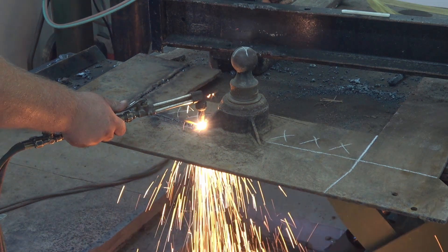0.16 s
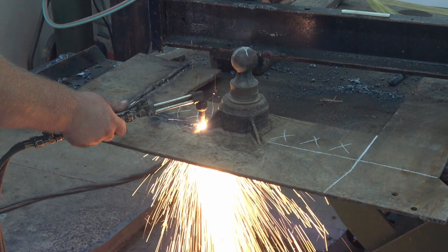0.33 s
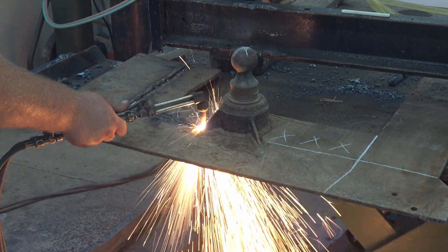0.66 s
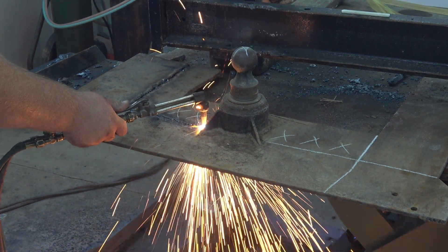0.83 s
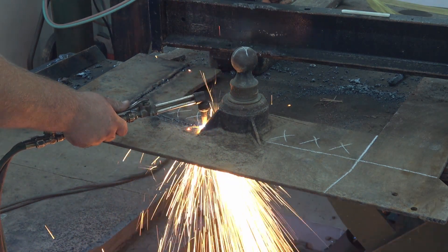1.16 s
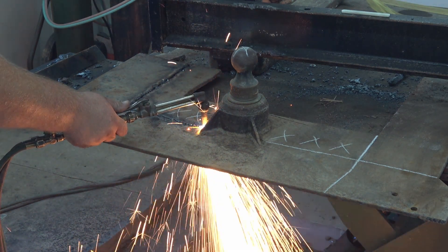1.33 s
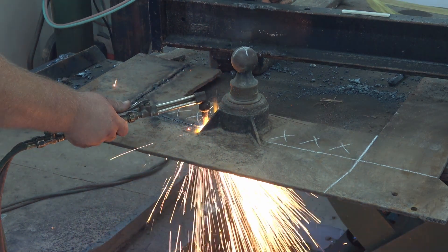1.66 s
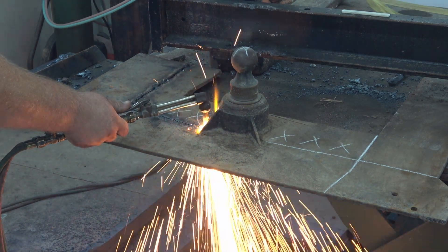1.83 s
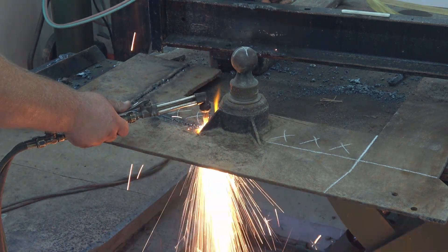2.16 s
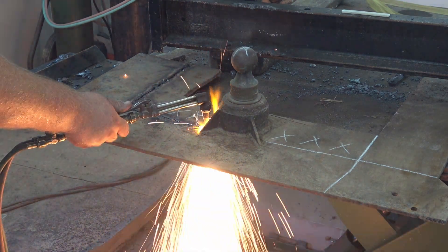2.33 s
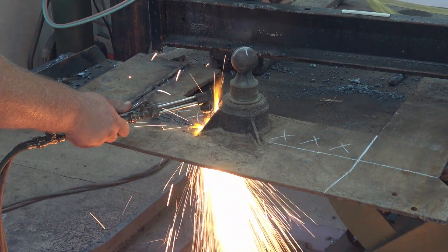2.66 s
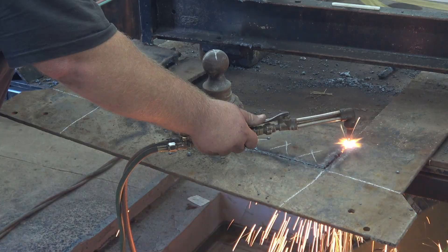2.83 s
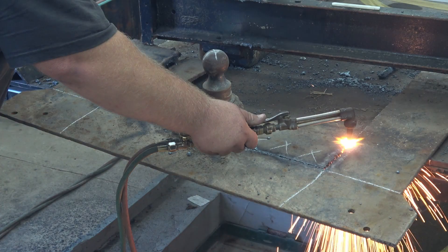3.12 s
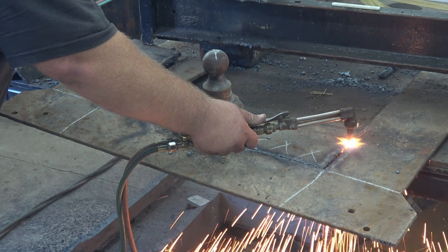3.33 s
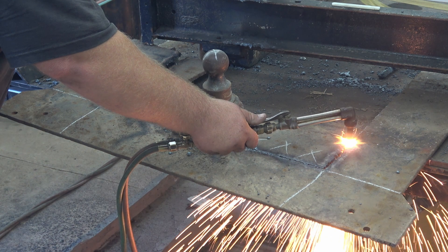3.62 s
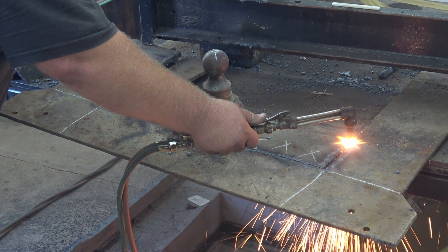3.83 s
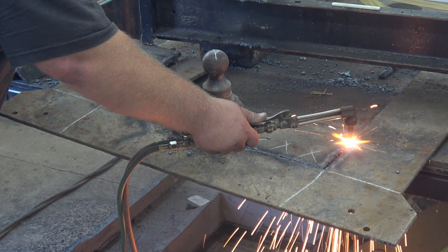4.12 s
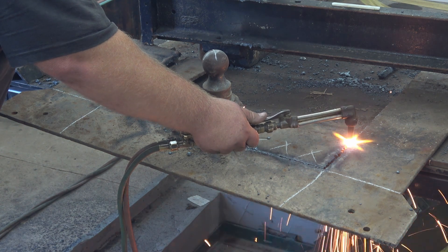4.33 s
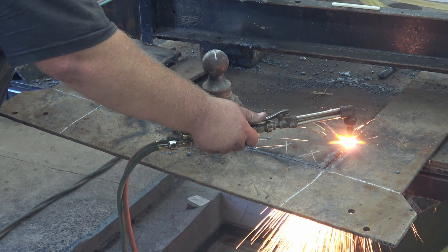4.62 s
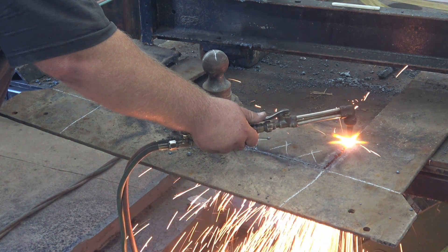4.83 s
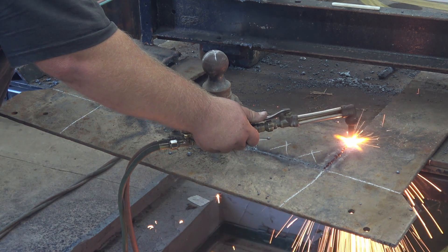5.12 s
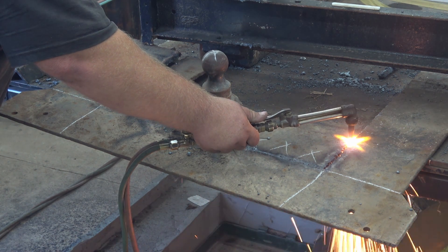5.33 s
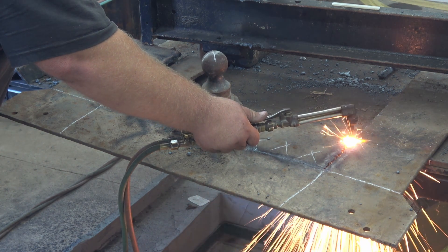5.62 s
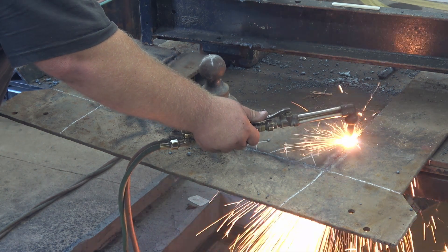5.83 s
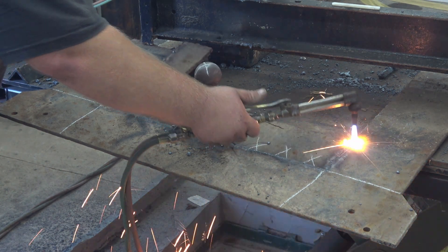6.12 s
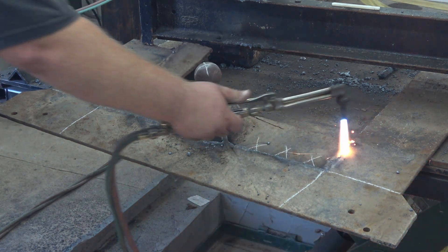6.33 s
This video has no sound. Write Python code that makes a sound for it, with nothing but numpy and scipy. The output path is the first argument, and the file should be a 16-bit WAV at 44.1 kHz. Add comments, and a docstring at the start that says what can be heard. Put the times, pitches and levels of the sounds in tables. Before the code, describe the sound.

A gas torch cuts a steel plate in a workshop with a loud, bright hiss over a hollow rush, while sparks crackle and spit. A little before halfway the tone changes abruptly, and faint breathy whistles join the hiss. Near the end the flame flutters and pops softly, the sparks stop, and it burns on with a duller roar. The sound is close and continuous.

```python
"""Oxy-fuel torch cutting steel

A torch cuts a plate in a workshop, at one spot and then, abruptly, at another. The oxygen jet hisses,
blows slag through the kerf and makes slot and plate ring; melt chokes the kerf at times, sparks spit.
At the end the oxygen lever is let go: the flame pops, flutters and burns on with a duller roar."""
import sys
import numpy as np
from scipy import signal
from scipy.fft import rfft, irfft
from scipy.io import wavfile
from scipy.ndimage import uniform_filter1d

SR = 44100
rng = np.random.default_rng(int(sys.argv[2]) if len(sys.argv) > 2 else 0)


def persist_wave(psi):
    """Save psi, clipped to +-1, as 16-bit WAV."""
    counts = np.round(np.clip(psi, -1, 1) * 32767).astype(np.int16)
    wavfile.write(sys.argv[1], SR, np.atleast_2d(counts).T)


N = 285768
TIME = np.arange(N) / SR
HZ = np.maximum(np.arange(N // 2 + 1) * SR / N, 1)
SECOND_CUT_S, LEVER_OFF_S = 2.781, 6.035


# Broad spectra of the two cuts and the bare flame: f/Hz, relative density/dB
FIRST_SPECTRUM = [(60, -47), (130, -33), (200, -30), (300, -22.5), (430, -14), (900, -2.5), (1700, -9.5),
                  (3000, -1.5), (5000, 1.5), (6500, 1.5), (8000, -4), (10000, -9.5), (12500, -11.5),
                  (15300, -11.5)]
SECOND_SPECTRUM = [(60, -47), (130, -38), (200, -33), (300, -21), (430, -6.5), (900, -7), (1700, -2.5),
                   (3000, -1.2), (5000, 1.5), (6700, -0.5), (8000, -3.5), (10000, -8.5), (12500, -11.5),
                   (15300, -12)]
BARE_SPECTRUM = [(60, -45), (130, -39), (200, -22), (300, -11.5), (430, -3), (900, 4.5), (1700, 5.5),
                 (3000, 0), (5000, -7), (6700, -6), (8000, -10), (10000, -15.5), (15300, -20)]
# Resonances of kerf, plate and space below: f/Hz, width/Hz, left/dB, right/dB (re broad spectrum)
FIRST_MODES = [(210, 14, 2, 7), (289, 26, 6, 8), (356, 19, 8, 8), (421, 49, 6, 7), (522, 123, 4, 6),
               (618, 27, 5, 2), (890, 90, -3, -4), (984, 14, 3, 2), (1073, 28, 1, 3), (1209, 14, 4, 5),
               (1371, 105, 5, 4), (1590, 130, 3, 6), (1704, 35, 5, 5), (1816, 72, 6, 7), (1984, 130, 6, 8),
               (2238, 130, 6, 5), (2685, 91, 2, -2), (3317, 17, 5, 5), (3995, 25, 5, -12),
               (4090, 110, -1, -5), (4407, 47, 1, -1), (5790, 120, -10, -1), (6290, 160, -6, 0)]
SECOND_MODES = [(210, 14, 2, 8), (239, 14, 9, 6), (291, 29, 5, 7), (410, 20, 2, 2), (497, 24, 6, 7),
                (563, 14, 1, 3), (637, 45, -1, 3), (694, 14, 9, 9), (830, 127, 4, 3), (1031, 22, 5, 9),
                (1120, 62, 3, 4), (1278, 14, 2, 5), (1387, 130, 2, -1), (1529, 24, 5, 7), (1806, 19, 2, -4),
                (1942, 19, 4, 5), (2260, 110, -1, -3), (2316, 18, 3, 0), (2513, 26, 5, -3),
                (2597, 24, 6, 1), (3134, 22, 3, 1), (3313, 40, -1, -4), (3902, 14, 6, 3), (4140, 35, 4, -3),
                (4330, 51, 4, -12), (4734, 16, 3, 3), (6087, 24, 2, 5), (6150, 180, -2, 1),
                (6520, 16, 2, 3), (6630, 170, -5, 2)]
BARE_MODES = [(660, 240, -2, -4), (1170, 180, 1, 3), (1750, 20, -4, 3), (1810, 89, -1, -1),
              (2150, 123, 4, 0), (2700, 482, 1.5, -14)]
# Bands (rows: roar, slag rush, bite, oxygen hiss, sizzle): first cut/dB, second cut/dB, slope/(dB/s),
# bare flame/dB, slope/(dB/s), flow share, choke share
BAND_LEVELS = [(-39.5, -37, -0.36, -34.5, 0, 0.28, 0.79), (-32.5, -32, 0.5, -35, 9.5, 0.4, 0.78),
               (-32.5, -30.5, 0.6, -41, 6, 1.25, 0.72), (-27.5, -26.5, -0.26, -38.5, 2, 1.46, -0.23),
               (-32, -32, -1.2, -45, -3, 0.91, -0.26)]
# Melt chokes the kerf, low bands swell: t/s, length/s, swell/dB (before choke share)
KERF_CHOKES = [(0.672, 0.26, 3.5), (2.262, 0.12, 5.5), (4.793, 0.085, 2), (5.13, 0.7, 2)]
# Sizzle surges: t/s, length/s, gain/dB
SIZZLE_SURGES = [(.85, 0.21, 1), (1.38, .24, 1.2), (2.92, .24, 0.5), (4.27, 0.29, 2), (4.93, .11, 1.8),
                 (5.42, 0.12, 1)]
def torch(flow_db, low_dip_db, hiss_dip_db):
    """Two cuts, then the bare flame; the flame flutters and melt makes the jet sputter."""
    flutter_db, sputter_db = 0.37 * drift(33), 0.3 * drift(90)
    waver_db = 0.5 * np.array([drift(8.5) for _ in BAND_LEVELS])
    unrest_db = np.array(3 * [flutter_db] + 2 * [sputter_db]) + waver_db
    surge_db, = spells(SIZZLE_SURGES, attack_s=.03, release_s=.025)
    choke_db, = spells(KERF_CHOKES, attack_s=.021, release_s=.047)
    dips_db = np.array(3 * [low_dip_db] + [hiss_dip_db, 0.52 * hiss_dip_db - surge_db])
    columns = np.transpose(BAND_LEVELS)[:, :, None]
    first_db, second_db, second_db_per_s, bare_db, bare_db_per_s, flow_share, choke_share = columns
    cutting_db = flow_share * flow_db + choke_share * choke_db - dips_db + unrest_db
    second_db = second_db + second_db_per_s * (TIME - SECOND_CUT_S)
    bare_db = bare_db + bare_db_per_s * (TIME - LEVER_OFF_S)
    first = jet(FIRST_SPECTRUM, FIRST_MODES, first_db + cutting_db)
    second = jet(SECOND_SPECTRUM, SECOND_MODES, second_db + cutting_db)
    bare = jet(BARE_SPECTRUM, BARE_MODES, bare_db + unrest_db)
    moved, released = step(SECOND_CUT_S, .002), step(LEVER_OFF_S, .041)
    cuts = np.sqrt(1 - moved) * first + np.sqrt(moved * (1 - released)) * second
    return cuts + np.sqrt(released) * bare


# Crossovers of the five bands: f/Hz
BAND_EDGES_HZ = [800, 2150, 3300, 7200]
def jet(spectrum, modes, levels_db):
    """Turbulent gas drives the resonances; each band follows its own level curve."""
    gas = turbulence() * from_db(over_hz(spectrum)) * resonances(modes)
    gas = gas * reflections(count=64, echo_db=-18.5, spread_s=.06)
    lowpasses = [below(hz, order=5) for hz in BAND_EDGES_HZ]
    bands = np.diff([np.zeros_like(HZ), *lowpasses, np.ones_like(HZ)], axis=0)
    power = np.abs(gas.mean(axis=0)) ** 2
    band_rms = np.sqrt(2 * np.bincount(np.digitize(HZ, BAND_EDGES_HZ), power)) / N   # Parseval
    return sum(from_db(db) * irfft(gas * band, N) / rms
               for db, band, rms in zip(levels_db, bands, band_rms))


# Jet strength in the kerf: t/s, level/dB (re usual flow)
JET_FLOW = [(0, 0.1), (.34, -1.5), (.42, 0.8), (.85, 1.4), (.97, -0.5), (1.2, -.5), (1.57, 0.5),
            (1.8, -0.4), (1.91, 1.5), (2, 0.7), (2.13, 2.1), (2.25, -0.8), (2.34, 1), (2.45, -1.2),
            (2.77, 0), (2.79, .5), (2.98, 0.5), (3.22, 1.4), (3.34, 0.1), (3.65, 0.6), (3.78, -.4),
            (4.02, .5), (4.5, 0.34), (5, 1), (5.08, 0.1), (5.48, 0.75), (5.62, -1), (5.79, -0.6),
            (5.87, -2.3)]
# Jet falters: t/s, length/s, dip of the three low bands/dB, hiss dip/dB
JET_FALTERS = [(0.61, 0.055, 1, 2.5), (2.47, 0.18, -0.5, 2), (3.06, 0.12, 2.5, 1.2),
               (3.47, 0.096, 2.5, 2.5), (4.57, 0.18, 2.5, 4), (5.85, 0.043, 1, 1.5), (5.88, 0.29, 2, -0.5)]
def oxygen_flow():
    """The jet varies in strength and falters briefly: flow, low dip and hiss dip, in dB."""
    flow_db = np.interp(TIME, *np.transpose(JET_FLOW))
    low_dip_db, hiss_dip_db = spells(JET_FALTERS, attack_s=.033, release_s=.037)
    return flow_db, low_dip_db, hiss_dip_db


# Stereo coherence: f/Hz, left-right correlation
COHERENCE = [(60, 0.13), (130, 0.02), (290, 0.72), (640, 0.73), (1410, 0.66), (3100, 0.63), (5000, 0.42),
             (6820, -0.19), (15000, -0.21)]
# Stereo balance: f/Hz, left minus right/dB
PAN = [(300, 1.8), (3500, 2), (5000, -0.5), (6200, -2), (8000, 0.7), (11000, 2), (15000, 4.5)]
def turbulence():
    """Stereo noise spectrum, coherent in the midrange, diffuse in bass and treble."""
    mid, side = rfft(rng.standard_normal((2, N)))
    correlation = over_hz(COHERENCE)
    signs = np.array([[1], [-1]])
    noise = np.sqrt(1 + correlation) * mid + np.sqrt(1 - correlation) * side * signs
    return noise * from_db(signs * over_hz(PAN) / 2)


def resonances(modes):
    """Stereo gain of resonant peaks on a flat floor."""
    power = np.ones((2, len(HZ)))
    for hz, width_hz, left_db, right_db in modes:
        power += from_db([[left_db], [right_db]]) ** 2 / (1 + (2 * (HZ - hz) / width_hz) ** 2)
    return np.sqrt(power)


def reflections(count, echo_db, spread_s):
    """Small steel faces throw back the treble and ripple its spectrum."""
    echoes = np.zeros((2, N))
    for lateness, side, polarity in rng.random((count, 3)):
        skew_s = (side - .5) * np.array([.0002, -.0002])
        delay_s = .002 + lateness * spread_s + skew_s
        echoes[[0, 1], np.round(delay_s * SR).astype(int)] += np.sign(polarity - .5) * np.exp(-lateness)
    treble = np.sqrt((1 - below(2800, order=2)) * below(9500, order=2))
    return 1 + from_db(echo_db) * rfft(echoes) * treble


# Lower whistle flares: t/s, length/s, gain/dB
WHISTLE_FLARES = [(3.2, .2, 1), (3.59, 0.15, 5), (4.78, 0.069, 3), (5.18, 0.42, 2.5)]
def slot_whistles(flow_db, dip_db):
    """The second cut whistles at two pitches; both follow the flow and rise as the slot opens."""
    flare_db, = spells(WHISTLE_FLARES, attack_s=.02, release_s=.023)
    opened = step(at_s=3.52, rise_s=.08)
    low_hz = 2560 + 29.8 * opened + 30 * drift(3.95)
    high_hz = 4735 + 195.4 * opened
    low_db = -37.5 + 0.55 * flow_db + flare_db
    high_db = -38.7 + 1.4 * flow_db - 2.9 * dip_db
    low = whistle(low_hz, low_db, width_hz=220, pan_db=-1, diffuse=0.86)
    high = whistle(high_hz, high_db, width_hz=96, pan_db=1, diffuse=0.74)
    return (low + high) * step(SECOND_CUT_S, .002) * (1 - step(at_s=5.82, rise_s=.03))


def whistle(hz, level_db, width_hz, pan_db, diffuse):
    """Breathy, throbbing noise in one narrow, moving resonance."""
    white = rng.standard_normal((2, 3, N))
    sine, cosine = irfft(rfft(white) * np.sqrt(below(width_hz / 2, order=2)), N)
    phase = 2 * np.pi * np.cumsum(hz) / SR
    tones = sine * np.sin(phase) + cosine * np.cos(phase)
    stereo = (tones[0] + diffuse * tones[1:]) * from_db([[pan_db / 2], [-pan_db / 2]])
    throb_db = 2 * drift(7.5)
    return from_db(level_db + throb_db) * steady(stereo, window_samples=5000)


# Gas hoots in the choked kerf, slot squeals, slag rasps: t/s, length/s, f/Hz, nominal width/Hz, level/dB
GAS_HOOTS = [(.675, .07, 920, 130, -38), (2.239, .1, 970, 140, -29.5), (2.252, .042, 955, 70, -27.3),
             (2.442, .04, 990, 100, -35)]
SLOT_SQUEALS = [(.42, .1, 6350, 150, -39), (2.95, .12, 6230, 110, -34), (3.4, 0.11, 6040, 80, -35),
                (4.13, .12, 6700, 80, -39)]
SLAG_RASPS = [(2.265, .11, 2280, 380, -36), (4.79, .08, 2350, 300, -34), (5.17, 0.37, 2270, 300, -35)]
def kerf_bursts():
    """Gas pockets hoot hollowly, the slot squeals and slag rasps."""
    hoots = gas_pockets(GAS_HOOTS, attack_s=.004, release_s=.015)
    return hoots + gas_pockets(SLOT_SQUEALS + SLAG_RASPS, attack_s=.02, release_s=.02)


# Flame pop with rebounds, and flutter around it: t/s, length/s, f/Hz, nominal width/Hz, level/dB
FLAME_POP = [(6.011, .016, 720, 400, -27.5), (6.017, .016, 450, 110, -24), (6.038, .056, 620, 260, -30.5),
             (6.089, .028, 425, 60, -29.5)]
FLAME_FLUTTER = [(5.95, 0.17, 215, 35, -50.5), (5.912, 0.2, 420, 80, -37)]
def lever_pop():
    """The flame pops, rebounds twice and flutters as the oxygen lever is let go."""
    pop = gas_pockets(FLAME_POP, attack_s=.0054, release_s=.007)
    return pop + gas_pockets(FLAME_FLUTTER, attack_s=.02, release_s=.025)


def gas_pockets(rows, attack_s, release_s):
    """Each pocket of gas resounds briefly at its own pitch."""
    out = np.zeros((2, N))
    noise = turbulence() * (1 - below(240, order=4))
    for at_s, length_s, hz, width_hz, level_db in rows:
        resonance = 1 / (1 + 1j * (HZ / hz - hz / HZ) * hz / (2 * width_hz))
        ring = steady(irfft(noise * resonance ** 2, N), window_samples=700)   # squared: steep skirts
        out += from_db(level_db) * gate(at_s, length_s, attack_s, release_s) * ring
    return out


# Loud spits of molten steel: t/s, peak/dB
STEEL_SPITS = [(1.508, -19), (3.28, -19), (3.309, -14), (4.489, -14), (5.413, -15)]
def sparks(jet_db, rate_per_s=60, decay_s=.00049):
    """Droplets burst at random while the jet cuts, each a short, bright snap."""
    bursts = rng.random(N) < rate_per_s / SR * (TIME < LEVER_OFF_S)
    size_db = -28 + 3 * np.minimum(rng.exponential(1, N), 3)
    scatter_db = rng.normal(0, 2, (2, N))
    clicks = bursts * from_db(size_db + jet_db + scatter_db)
    for at_s, peak_db in STEEL_SPITS:
        clicks[:, round(at_s * SR)] += from_db(peak_db)
    age_s = TIME[:SR // 100]
    snap = rng.standard_normal((2, len(age_s))) * np.exp(-age_s / decay_s)
    snap = signal.sosfilt(signal.butter(2, [1800, 9000], "band", fs=SR, output="sos"), snap)
    return signal.fftconvolve(clicks, snap / np.abs(snap).max(), axes=1)[:, :N]


# Workshop rumble: f/Hz, relative density/dB
RUMBLE_SPECTRUM = [(15, -10), (35, -2), (60, -4), (110, -6.5), (200, -4), (500, -38)]
def workshop_rumble():
    """Faint low noise that wavers and eases off."""
    level_db = -70 - 5 * step(at_s=4.1, rise_s=.7) + 1.7 * drift(6.1)
    noise = irfft(turbulence() * from_db(over_hz(RUMBLE_SPECTRUM)), N)
    return from_db(level_db) * unit_rms(noise)


def from_db(db):
    """Decibels to gain."""
    return 10 ** (np.asarray(db) / 20)


def unit_rms(x):
    """Scale the channel mean to rms 1."""
    return x / np.sqrt(np.mean(np.atleast_2d(x).mean(axis=0) ** 2) + 1e-20)


def steady(x, window_samples):
    """Level a narrow noise to rms 1, as in a self-sustained resonance."""
    power = uniform_filter1d((x ** 2).mean(axis=0), window_samples)
    return unit_rms(x / np.sqrt(power + 1e-20))


def over_hz(points):
    """Interpolate over log frequency."""
    hz, value = np.transpose(points)
    return np.interp(np.log(HZ), np.log(hz), value)


def below(edge_hz, order):
    """Low-pass power response."""
    return 1 / (1 + (HZ / edge_hz) ** (2 * order))


def drift(rate_hz):
    """Random wavering up to about rate_hz, rms 1."""
    return unit_rms(irfft(rfft(rng.standard_normal(N)) * np.sqrt(below(rate_hz, order=2)), N))


def step(at_s, rise_s):
    """Smooth rise from 0 to 1, centred on at_s."""
    return .5 + .5 * np.tanh((TIME - at_s) / rise_s)


def gate(at_s, length_s, attack_s, release_s):
    """Rise, hold, fall."""
    return step(at_s, attack_s) * (1 - step(at_s + length_s, release_s))


def spells(rows, attack_s, release_s):
    """Summed gates, one curve per dB column."""
    return sum(np.outer(db, gate(at_s, length_s, attack_s, release_s)) for at_s, length_s, *db in rows)


def scene():
    """One oxygen flow drives torch, sparks and whistles; bursts, pop and rumble are added."""
    flow_db, low_dip_db, hiss_dip_db = oxygen_flow()
    cutting = torch(flow_db, low_dip_db, hiss_dip_db) + sparks(flow_db - hiss_dip_db)
    rumble = workshop_rumble()
    return cutting + kerf_bursts() + lever_pop() + slot_whistles(flow_db, hiss_dip_db) + rumble


def record(dry):
    """Steep low-pass on the top treble."""
    return irfft(rfft(dry) * np.sqrt(below(edge_hz=15830, order=150)), N)


dry = scene()
out = record(dry)
persist_wave(out)
```